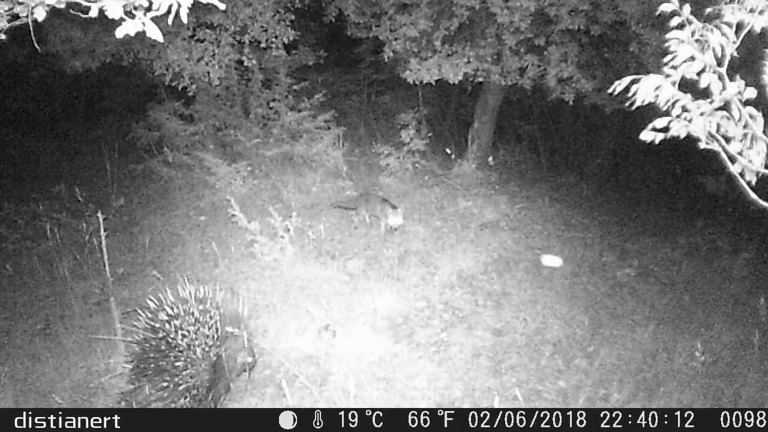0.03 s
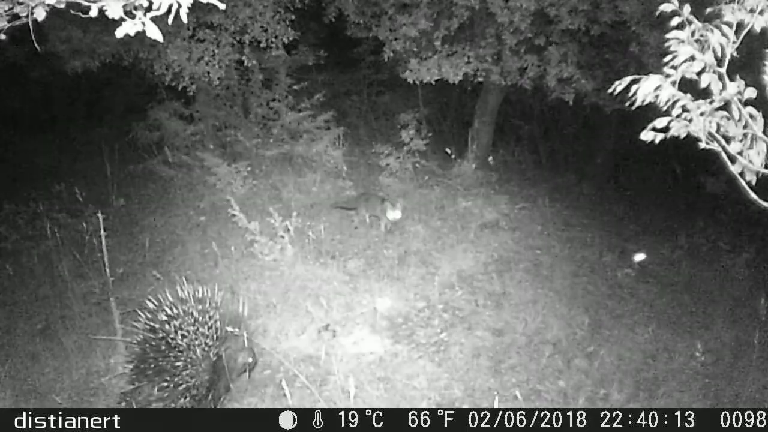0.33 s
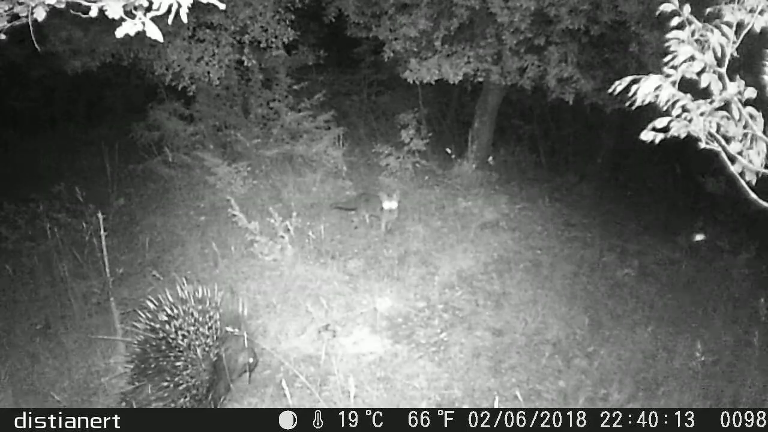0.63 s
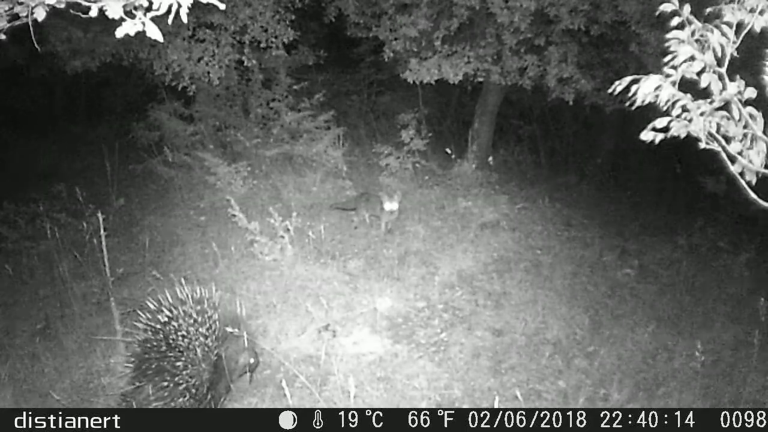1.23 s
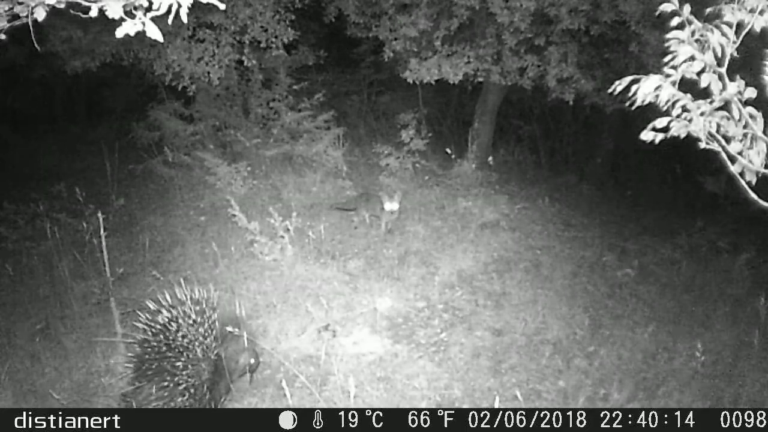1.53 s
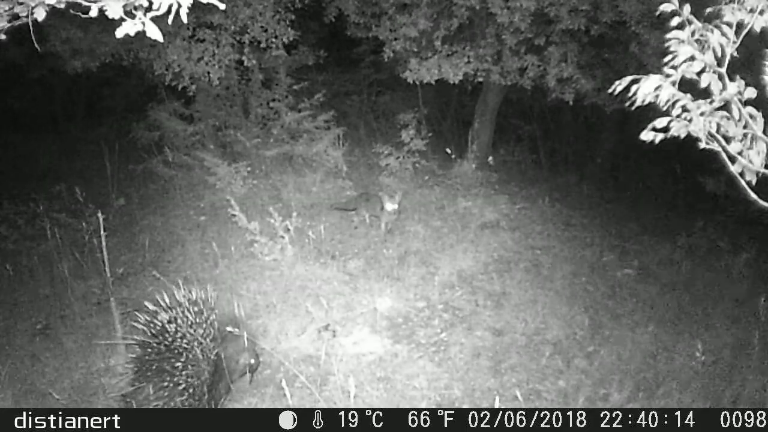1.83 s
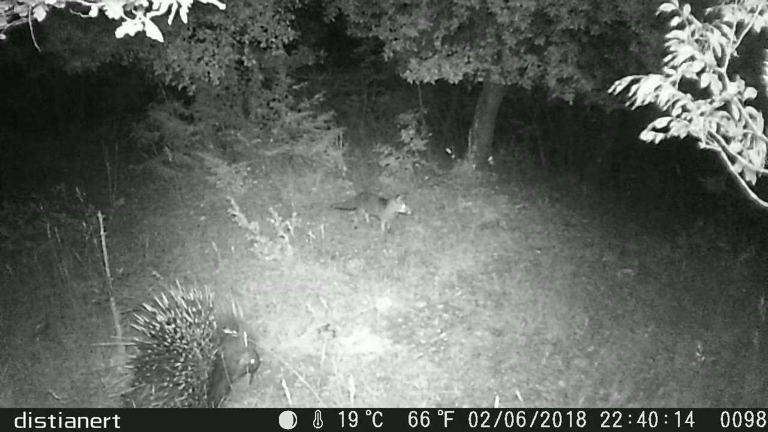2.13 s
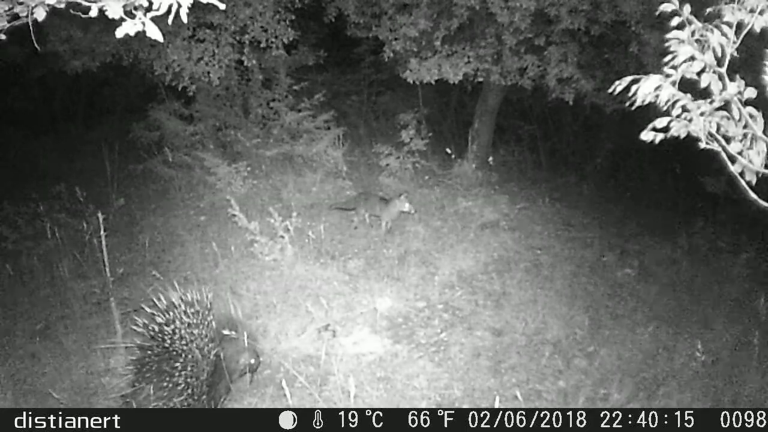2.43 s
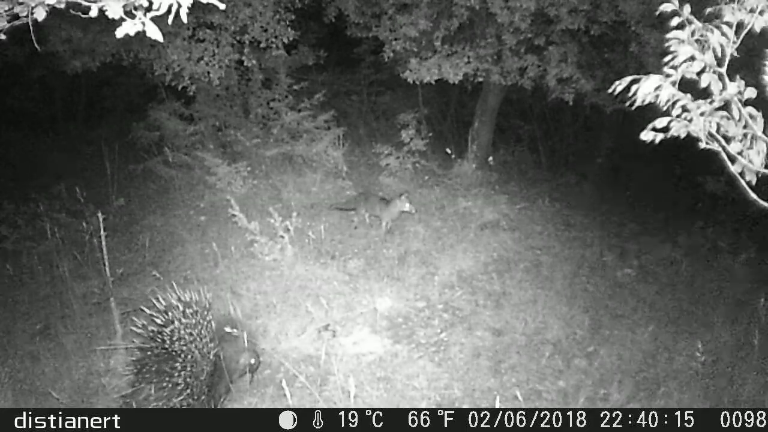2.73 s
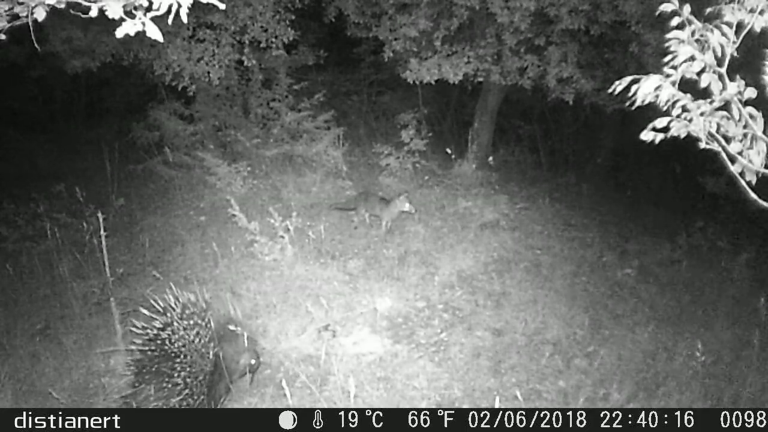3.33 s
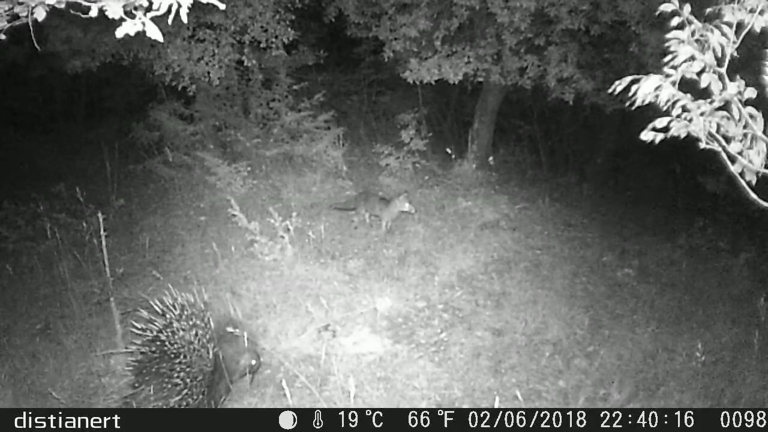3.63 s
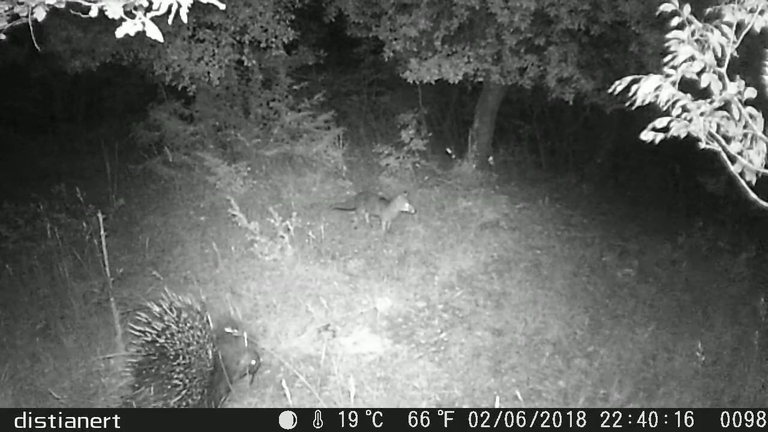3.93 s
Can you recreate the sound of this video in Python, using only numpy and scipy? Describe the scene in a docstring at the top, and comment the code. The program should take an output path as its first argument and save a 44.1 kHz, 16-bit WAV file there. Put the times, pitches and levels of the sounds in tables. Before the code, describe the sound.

A faint hiss with a low rumble follows one click as a trail camera's microphone switches on in a still clearing at night. The noise throbs quickly and evenly, with a fluttering high fizz and soft, dull thumps.

```python
"""A trail camera starts listening in a still clearing at night.
After a moment of silence its microphone switches on with one click, a voltage step that leaks away.
Then come a faint hiss and a low rumble that throb five times a second, probably from the camera's own
electronics, and a treble fizz that flutters at the picture rate. From half a second on, some throbs
carry a dull puff over a soft thump. The microphone's response colours all of it."""
import sys
import numpy as np
from scipy import signal
from scipy.fft import rfft, irfft
from scipy.io import wavfile

SR = 44100
rng = np.random.default_rng(int(sys.argv[2]) if len(sys.argv) > 2 else 0)


def unload_wav(signal):
    """Save mono or channel-first audio to the path in sys.argv[1] as 16-bit WAV at rate SR, clipped to [-1, 1]."""
    wavfile.write(
        sys.argv[1],
        SR,
        np.round(np.clip(np.atleast_2d(signal).T, -1, 1) * 32767).astype(np.int16),
    )


N = 176400
T = np.arange(N) / SR
HZ = np.fft.rfftfreq(N, 1 / SR)
SWITCH_ON_S = 0.0726


def gain_of(db):
    """Amplitude ratio of a level: a factor of ten for every 20 dB."""
    return 10 ** (np.asarray(db) / 20)


def unit_rms(x):
    """Normalisation to a root-mean-square value of 1."""
    return x / np.sqrt(np.mean(x ** 2) + 1e-20)


def gain_at(spectrum, hz):
    """Amplitude response, from levels interpolated on a logarithmic frequency axis."""
    corner_hz, db = np.transpose(spectrum)
    return gain_of(np.interp(np.log(hz + 1), np.log(corner_hz + 1), db))


def noise(spectrum, cutoff_hz=8760):
    """Spectral shaping: white noise weighted by a spectrum, band-limited and scaled to rms 1."""
    white = rfft(rng.standard_normal(N))
    return unit_rms(irfft(white * gain_at(spectrum, HZ) * (HZ < cutoff_hz), N))


def wander(bandwidth_hz):
    """Low-pass filtering of white noise gives a slow random fluctuation of rms 1."""
    white = rfft(rng.standard_normal(N))
    return unit_rms(irfft(white * np.exp(-(HZ / bandwidth_hz) ** 2) * (HZ > 0), N))


def throb(rate_hz=4.955, crest_s=0.105, squareness=1.8):
    """Soft clipping turns a cosine into a rounded square wave, the shared modulator from -1 to 1."""
    cycle = np.cos(2 * np.pi * rate_hz * (T - crest_s))
    return np.tanh(squareness * cycle) / np.tanh(squareness)


def pulse(centre_s, half_width_s):
    """A Gaussian pulse of height 1, falling to 1/e at one half-width from its centre."""
    return np.exp(-((T - centre_s) / half_width_s) ** 2)


def click(step_db=-18.5, time_constant_s=0.12):
    """Step response of a leaky circuit: the voltage jumps at switch-on, then decays exponentially."""
    age_s = np.maximum(T - SWITCH_ON_S, 0)
    return gain_of(step_db) * (T >= SWITCH_ON_S) * np.exp(-age_s / time_constant_s)


# Spectral density of the mid-range hiss (frequency [Hz], relative level [dB])
HISS_SPECTRUM = [(40, -8.5), (250, 2.5), (600, 0.5), (1200, 0), (2200, 0), (3500, -3), (5500, -2.5),
                 (8000, -14)]

def hiss(drift_db, level_db=-70, throb_db=1.7):
    """Amplitude modulation: broadband noise, probably electronic, swells and sinks with the throb."""
    return noise(HISS_SPECTRUM) * gain_of(level_db + throb_db * throb() + drift_db)


# Spectral density of the treble fizz (frequency [Hz], relative level [dB])
FIZZ_SPECTRUM = [(200, -16.5), (1500, -13), (3000, -4), (4500, -1.5), (6000, -0.5), (7300, 1.5), (8000, -3),
                 (8600, -19)]

def fizz(drift_db, level_db=-70, throb_db=0.7, dip_db=-7.0, dip_s=0.0062):
    """Pulse modulation: throbbing treble noise dips once per picture, which is heard as flutter."""
    picture_hz, first_picture_s = 24.83, 0.001
    pictures = (T - first_picture_s) * picture_hz
    from_nearest_s = ((pictures + 0.5) % 1 - 0.5) / picture_hz
    dip = np.exp(-(2 * from_nearest_s / dip_s) ** 4)
    return noise(FIZZ_SPECTRUM) * gain_of(level_db + throb_db * throb() + dip_db * dip + drift_db)


# Spectral density of the rumble (frequency [Hz], relative level [dB])
RUMBLE_SPECTRUM = [(4, -4.5), (10, -0.5), (30, -13), (60, -20), (120, -27.5), (250, -34.5), (600, -41.5),
                   (2000, -61.5)]

def rumble(level_db=-57.5, throb_db=1.4):
    """Comodulation: the level of low-frequency noise rises and falls in phase with the hiss."""
    return noise(RUMBLE_SPECTRUM) * gain_of(level_db + throb_db * throb())


# Spectral density of a puff (frequency [Hz], relative level [dB])
PUFF_SPECTRUM = [(10, 6.5), (35, 2), (100, -5.5), (250, -18), (550, -20), (1200, -36), (3000, -48)]
# Soft low puffs, each at the crest of its noise (time [s], level [dB])
PUFF_EVENTS = [(0.518, -60.5), (0.899, -60.5), (1.095, -59), (1.335, -62.5), (1.553, -59.5), (1.895, -60),
               (2.102, -60), (2.294, -62), (2.534, -66), (2.753, -64), (3.336, -65.5), (3.547, -62),
               (3.774, -63)]

def puffs():
    """Pressure transients: each dull noise burst rides on a rarefaction and a weaker, slower rebound."""
    puff_half_s, thump_half_s, thump_above_puff_db = 0.035, 0.016, 15
    rebound_delay_s, rebound_share = 0.047, 0.64
    air = noise(PUFF_SPECTRUM)
    out = np.zeros(N)
    for time_s, level_db in PUFF_EVENTS:
        burst = air * pulse(time_s, puff_half_s)
        rebound = rebound_share * pulse(time_s + rebound_delay_s, 2 * thump_half_s)
        thump = rebound - pulse(time_s, thump_half_s)
        out += gain_of(level_db) * (burst + gain_of(thump_above_puff_db) * thump)
    return out


def scene():
    """Superposition: from switch-on, the click and the noises add in one channel."""
    drift_db = 0.2 * wander(bandwidth_hz=23)  # common to hiss and fizz
    noises = hiss(drift_db) + fizz(drift_db) + rumble() + puffs()
    return (click() + (T >= SWITCH_ON_S) * noises)[None]


# Frequency response of the camera's microphone (frequency [Hz], gain [dB])
MIC_RESPONSE = [(100, 1), (1000, 0.5), (2000, -1), (2900, -3.5), (3700, -6), (5000, -12), (5900, -9.5),
                (7000, -5), (7600, -4.5), (8300, -5.5), (9200, -15.5), (12000, -19.5), (16000, -36)]
# Two narrow notches in that response (centre frequency [Hz], bandwidth [Hz])
MIC_NOTCHES = [(3210, 290), (6430, 440)]

def record(dry, fft_size=4096, notch_leak=0.18, cutoff_hz=16500):
    """Linear filters in cascade: the microphone's colour, its two notches and a band limit."""
    log_gain = np.log(gain_at(MIC_RESPONSE, abs(np.fft.fftfreq(fft_size, 1 / SR))))
    # The Hilbert transform of the log magnitude gives the minimum phase.
    response = np.exp(np.conj(signal.hilbert(log_gain)))
    impulse_response = np.fft.ifft(response).real[:fft_size // 2]
    out = signal.oaconvolve(dry, impulse_response[None])[:, :N]
    for centre_hz, width_hz in MIC_NOTCHES:
        notched = signal.lfilter(*signal.iirnotch(centre_hz, centre_hz / width_hz, SR), out)
        out = notch_leak * out + (1 - notch_leak) * notched
    low_pass = signal.firwin(255, cutoff_hz, window=("kaiser", 9), fs=SR)
    return signal.oaconvolve(out, low_pass[None], "same")


dry = scene()
out = record(dry)
unload_wav(out)
```